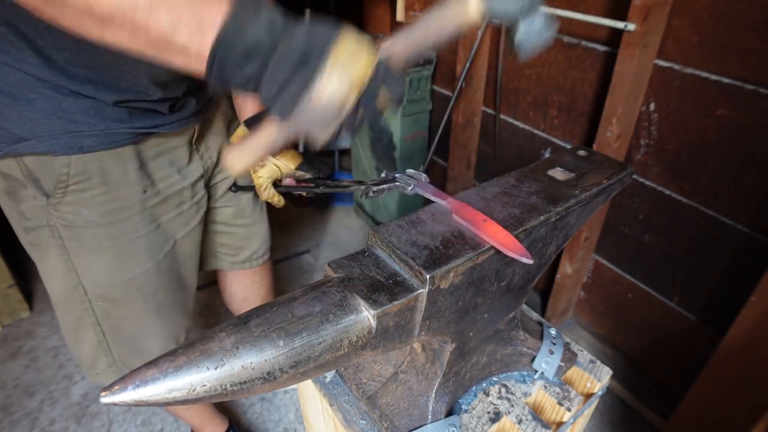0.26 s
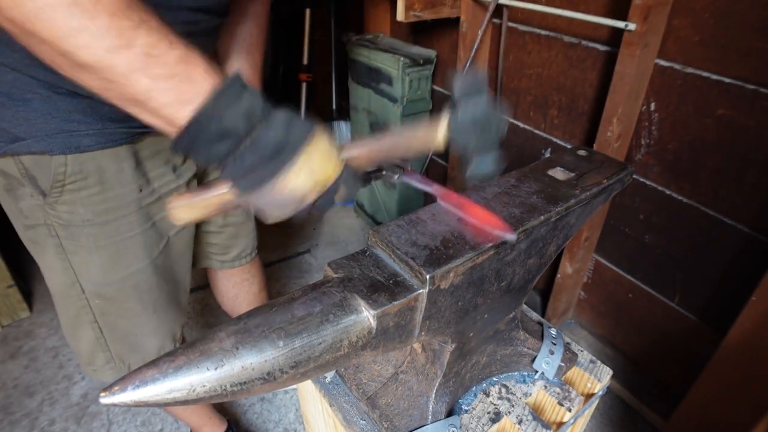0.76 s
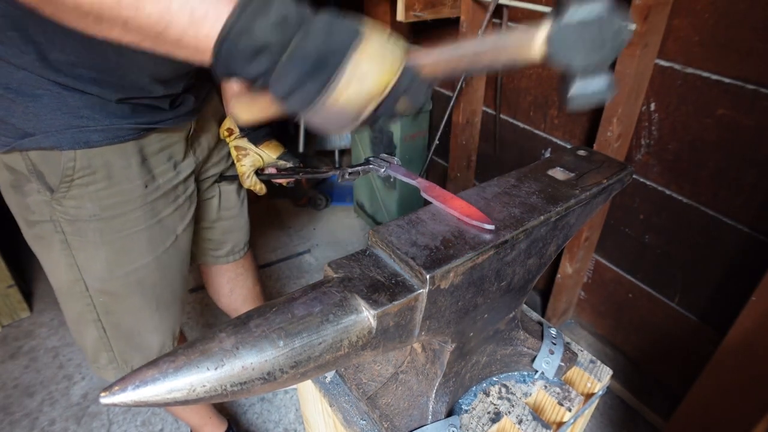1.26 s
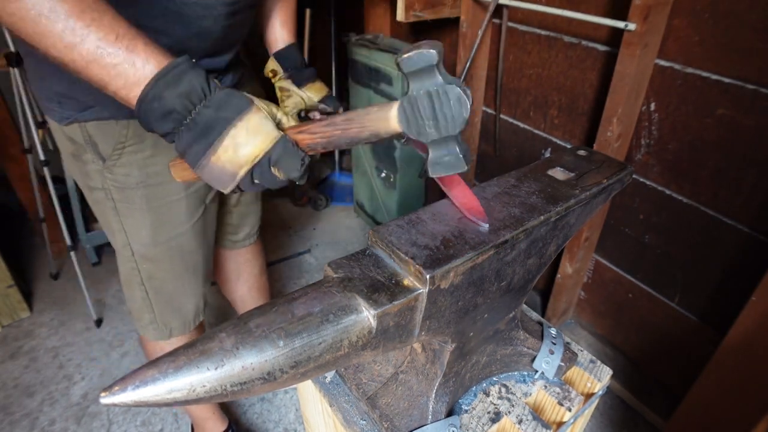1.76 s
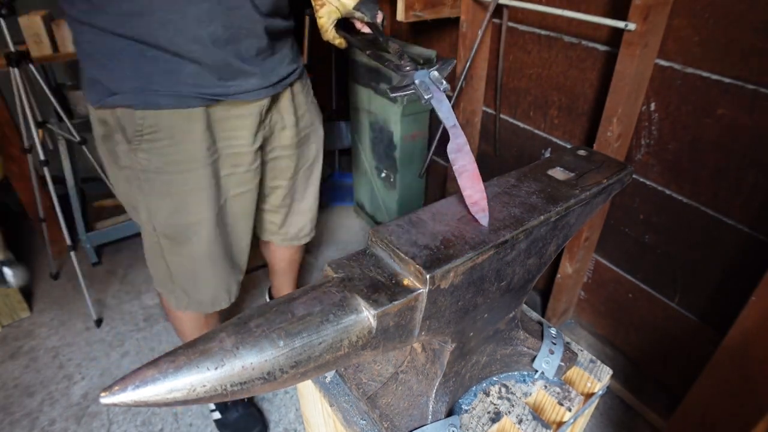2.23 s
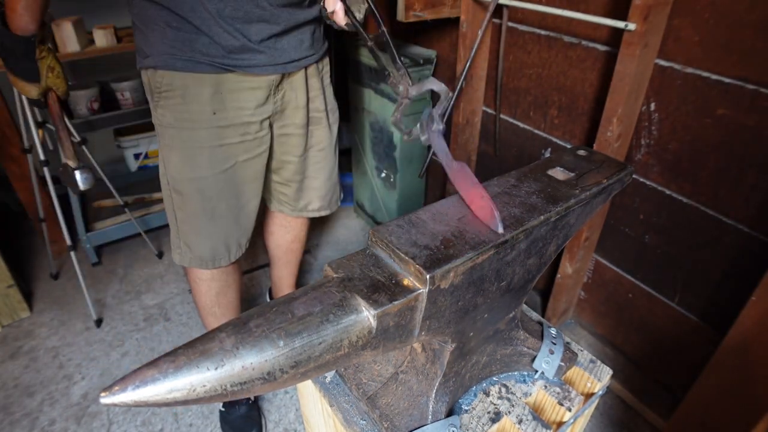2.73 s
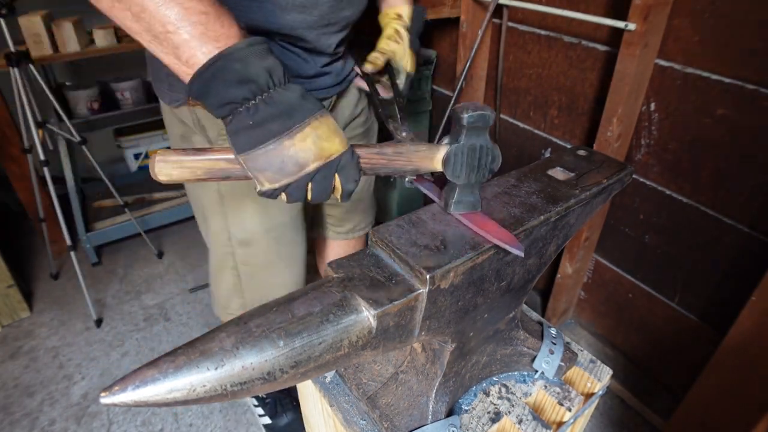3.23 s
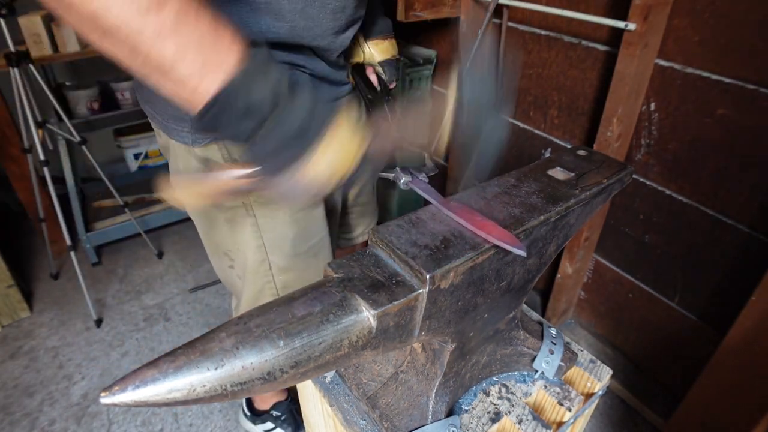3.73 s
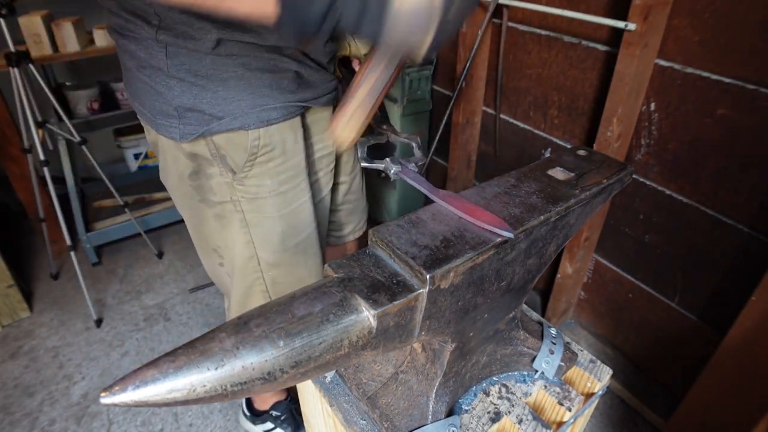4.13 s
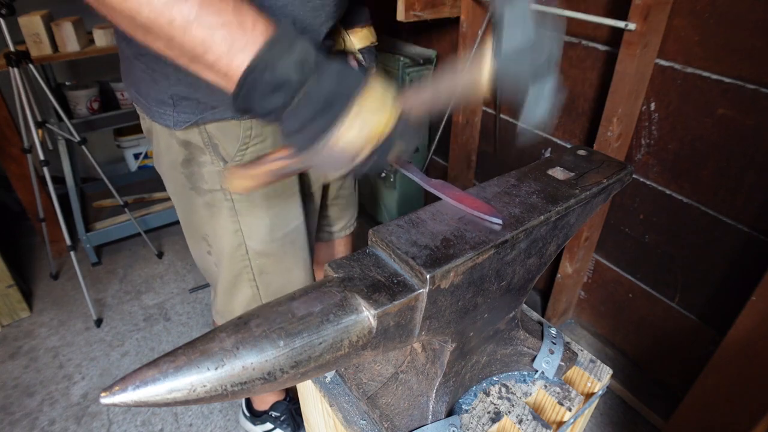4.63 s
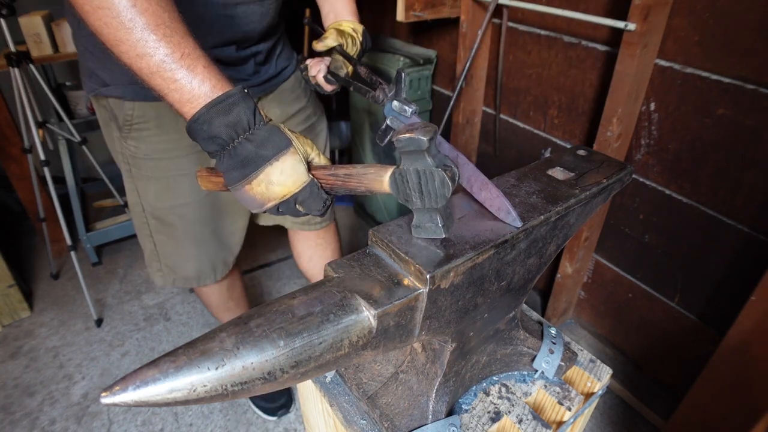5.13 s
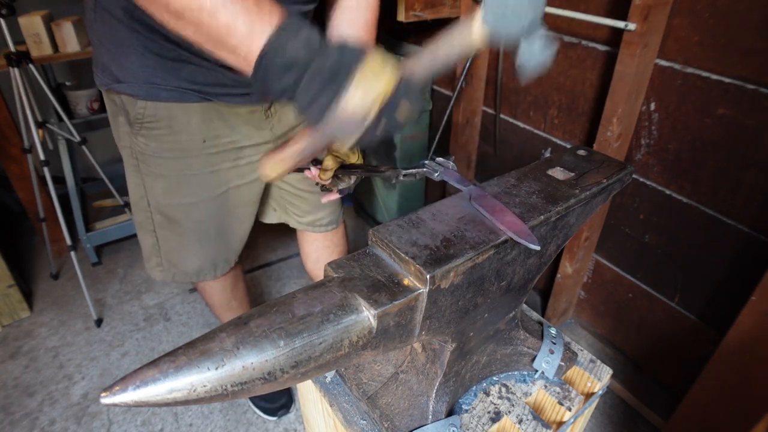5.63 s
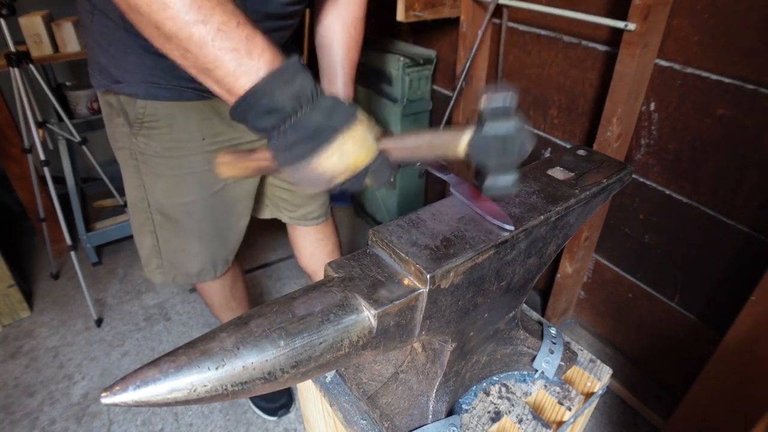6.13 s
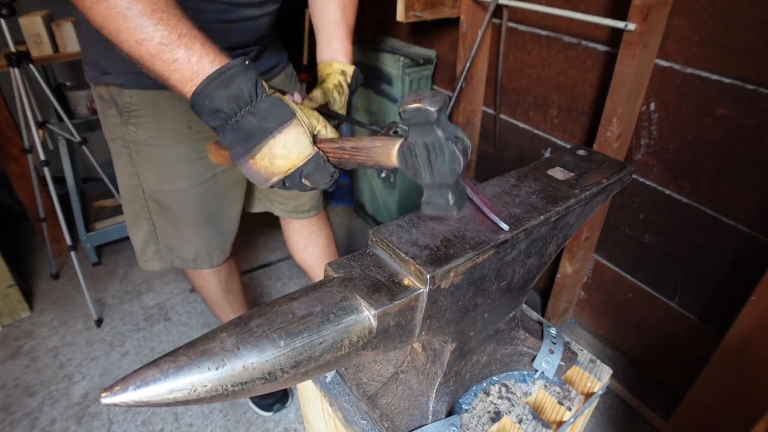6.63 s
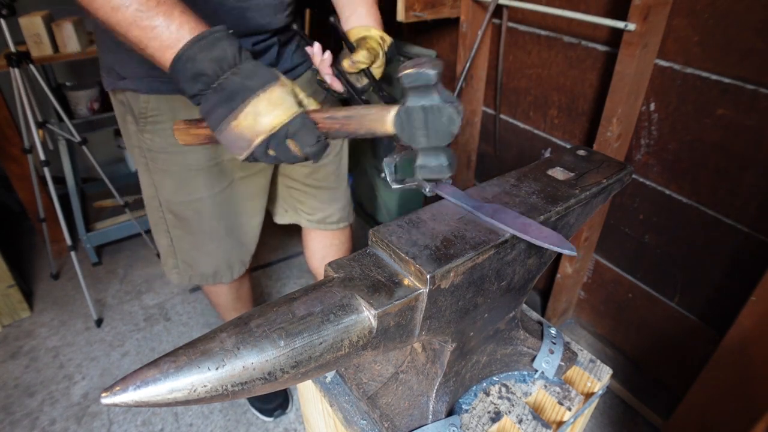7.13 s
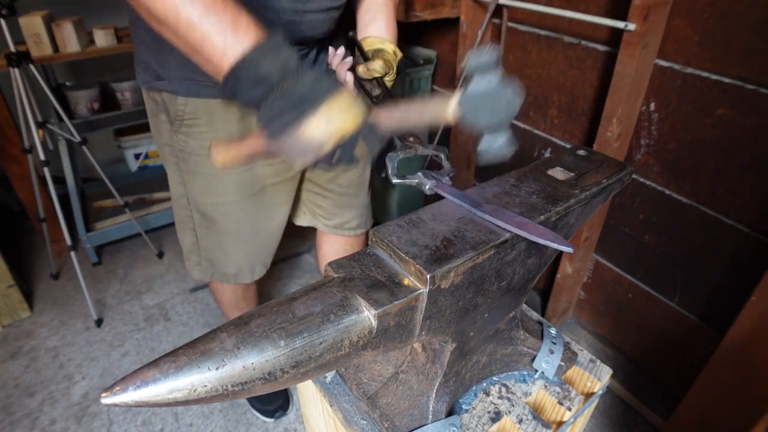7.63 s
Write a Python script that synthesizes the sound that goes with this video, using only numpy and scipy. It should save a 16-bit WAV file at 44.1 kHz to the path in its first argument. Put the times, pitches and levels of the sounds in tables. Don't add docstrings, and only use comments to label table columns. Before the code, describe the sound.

A fluttering low-mid burner roar and faint gas hiss never stop. Over them, nine sharp hammer blows on a blade, a tumbling bounce on bare anvil, a pause with chattering tongs, nine more blows, another bounce, a faster run of eight, bounces again, then four last blows. Heard near the anvil in a small wooden shop, the background ducking at each hit and recovering instantly.

```python
import sys
import numpy as np
from scipy import signal
from scipy.fft import rfft, irfft, next_fast_len
from scipy.io import wavfile
from scipy.ndimage import uniform_filter1d

SR = 44100
rng = np.random.default_rng(int(sys.argv[2]) if len(sys.argv) > 2 else 0)


def wav_out(sig):
    wavfile.write(sys.argv[1], SR, np.round(np.clip(np.atleast_2d(sig).T, -1, 1) * 32767).astype(np.int16))


def magnitude_from_level(level_db):
    exponent = np.asarray(level_db, float) / 20
    return 10 ** exponent


N = 347067

# (pitch [Hz], width [Hz], level [dB])
PIPE_MODES = [(446, 67, 12), (497, 74, 6), (587.5, 50, 9.5), (668, 87, 8), (703, 81, 7), (760, 63, 13),
              (877.2, 49, 17.5), (995, 50, 12.5), (1122, 87, 16), (1360, 43, 10), (1430, 100, 6),
              (1493, 57, 10), (1607, 81, 12), (1728, 50, 9), (1943, 86, 8), (2133, 183, -6)]
# (frequency [Hz], density [dB per Hz])
FLAME_SPECTRUM = [(18, -73), (30, -39), (91, -102), (161, -11), (289, -30.5), (454, 13), (620, -3.5),
                  (684, 14), (831, -5.5), (881, -3), (1250, -1.5), (1410, 6), (3200, -41), (4160, -68),
                  (7040, -120)]
# (frequency [Hz], density [dB per Hz])
JET_SPECTRUM = [(1410, -40), (2200, 4), (2620, 2), (3210, -13), (3720, 2), (4390, -14), (5010, 3),
                (5460, -4.5), (6290, -1), (7070, -9), (7710, -7), (9500, -12.5), (13500, -3.5),
                (15600, -12.5)]
# (centre [Hz], width [Hz], waver [dB])
JET_WHISTLES = [(2500, 500, 5), (3720, 600, 6), (5010, 900, 6), (6290, 900, 6), (7700, 1200, 5)]
# (time [s], peak [dB])
GAS_PUFFS = [(0.043, -30), (0.075, -33), (0.184, -28), (0.254, -28), (0.292, -28), (0.328, -27),
             (0.413, -33), (0.446, -30.5), (0.49, -30), (0.522, -31.5), (0.56, -40), (0.637, -30.5),
             (0.678, -30), (0.733, -32), (0.757, -33.5), (0.783, -34), (0.948, -32), (0.984, -32.5),
             (1.034, -34), (1.099, -32), (1.251, -37), (1.539, -32.5), (1.615, -34.5), (1.644, -30.5),
             (1.694, -31), (1.851, -33), (1.883, -34), (1.931, -31), (2.031, -34), (2.131, -34),
             (2.21, -31.5), (2.415, -32), (2.49, -30), (2.555, -32), (2.585, -27), (2.612, -31),
             (2.655, -32), (2.702, -29.5), (2.811, -28), (2.869, -29), (2.903, -24.5), (2.953, -29),
             (2.992, -27.5), (3.029, -28), (3.077, -29.5), (3.123, -25.5), (3.16, -23.5), (3.2, -24.5),
             (3.252, -23.5), (3.291, -29), (3.376, -25.5), (3.414, -26.5), (3.451, -25.5), (3.498, -25.5),
             (3.542, -26),
             (3.589, -35), (3.626, -28.5), (3.653, -27.5), (3.723, -31.5), (3.781, -25.5), (3.824, -32),
               (3.863, -38), (3.889, -33), (3.928, -32), (3.992, -34), (4.186, -33), (4.251, -32),
               (4.29, -34), (4.32, -36), (4.654, -32.5), (4.764, -34.5), (4.82, -31), (4.902, -33.5),
               (5.045, -32), (5.177, -34.5), (5.213, -32.5), (5.273, -31.5), (5.431, -29.5), (5.471, -31.5),
               (5.504, -29.5), (5.554, -28), (5.597, -28.5), (5.631, -28), (5.665, -28), (5.706, -26),
               (5.741, -27.5), (5.769, -33), (5.828, -29.5), (5.904, -31.5), (5.944, -33), (5.99, -30.5),
               (6.02, -31.5), (6.091, -33.5), (6.169, -32), (6.277, -32.5), (6.399, -36), (6.434, -32),
               (6.485, -36), (6.844, -34), (6.92, -33.5), (7.035, -32.5), (7.1, -31), (7.141, -32.5),
               (7.203, -34), (7.229, -29), (7.26, -29.5), (7.301, -29.5), (7.409, -29.5), (7.436, -29),
               (7.497, -35), (7.673, -32.5), (7.705, -33), (7.744, -33.5), (7.809, -33), (7.853, -34.5)]
# (time [s], gain [dB])
LEVELLER = [(0.0, 1.2), (0.35, 2.5), (0.8, -3), (1.75, -4.5), (2.1, -3), (2.3, -2.5), (2.7, 4.5),
            (3.3, 8.5), (3.62, 5), (4.15, -4.5), (4.65, -2.5), (5.08, -5), (5.62, 2.5), (6.05, -2),
            (6.8, -2.5), (7.15, -2.5), (7.47, 3), (7.87, -8.5)]
# (pitch [Hz], level [dB rms])
WHINE_TONES = [(10987, -86), (11300, -82), (11940, -85), (12242, -83), (12398, -80), (12554, -83),
               (12871, -86), (13028, -87), (13184, -75), (13340, -82), (13496, -82), (13652, -80),
               (14594, -83), (14912, -89)]

# (time [s], peak [dB])
LOW_CLICKS = [(0.116, -54), (0.533, -53), (0.686, -51), (1.006, -59), (3.26, -42), (3.563, -50), (4.875, -55),
              (4.995, -60), (5.56, -60), (5.751, -63), (6.111, -53), (6.463, -56), (7.331, -50), (7.473, -54),
              (7.713, -55)]

# (time [s], peak [dB], limiter dive [dB], brightness [dB per octave], hammer ring [dB])
TOUCHES = [
    (0.1182, -45, 16.5, -1, -22),
    (1.8083, -41, 17, 8, 7),
    (3.259, -47, 28, 2.5, -34),
    (4.877, -39, 17, 6, 10),
    (5.609, -42.5, 4.5, 8, -10),
    (7.331, -42.5, 8.5, 6, -35),
]
# (time [s], peak [dB], limiter dive [dB], hammer ring [dB], clear note [dB])
BLOWS = [(0.3876, -39.5, 22, -1, 10), (0.534, -36.5, 22, 8, 12), (0.6878, -36.5, 22.5, 7, 12),
         (0.8492, -38, 22.5, 0, 10), (1.0077, -35, 20.5, -8, 8), (1.173, -36.5, 21, 0, 7),
         (1.3276, -36, 17.5, 3, 11), (1.4914, -37.5, 20, 11, 7), (1.6533, -39.5, 22, 13, 4),
         (3.5644, -35.5, 24.5, -11, 5), (3.7003, -36, 23, -8, 5), (3.837, -37, 21, 4, 11),
         (3.9737, -37, 17.5, 0, 14), (4.1154, -37.5, 18, 8, 13), (4.2669, -38, 20, 7, 13),
         (4.421, -39.5, 21, 2.5, 16), (4.5798, -35, 17, 5, 9), (4.7409, -34, 18, 6, 8),
         (5.7529, -37, 22, -3, 6), (5.8777, -37.5, 21.5, 2, 12), (5.9973, -41, 20, -10, 5),
         (6.1144, -39, 16.5, 0, 4), (6.2264, -37.5, 16.5, -6, 5), (6.3459, -35, 15.5, -3, -2),
         (6.4633, -35, 16, -3.5, 1), (6.5735, -34.5, 13, -2, -3), (7.4739, -37, 20.5, 4, 4),
         (7.5916, -39, 21, 8, 13), (7.7138, -38, 18.5, 6, 18), (7.8349, -38, 17, -3, 13)]
# (time [s], peak [dB], limiter dive [dB], click [dB], brightness [dB per octave])
BOUNCES = [(1.9134, -42, 16.5, -24, 5), (1.9718, -40.5, 11.5, -20.5, 2), (2.0065, -35, -1.5, -24, 1),
           (2.0295, -38.5, -2.5, -26, -3.5), (2.0462, -42, -4, -30, -7), (2.0578, -57, 1, -29, -3),
           (2.0925, -36, -5, -22, -2), (2.1274, -41, -7, -30, -5), (4.97, -40, 12, -22.5, 3),
           (5.0176, -39.5, 7.5, -21.5, 4), (5.0468, -35.5, -10, -21, 2), (6.7003, -42, 16.5, -19.5, 3),
           (6.7644, -41, 11, -23, 2), (6.807, -42, 10.5, -23, 1), (6.8363, -34, -7, -23, 4),
           (6.8514, -37, -7, -30, -4), (2.071, -54, -14, -32, -3), (5.0585, -51, -16, -30, -3),
           (6.8605, -49, -11, -32, 1)]
# (time [s], peak [dB], bright ring [dB])
TONG_TICKS = [
    (2.2174, -64, -14),
    (5.4088, -55, 0),
    (5.472, -62, -10),
    (5.515, -64, -10),
]

# (level [dB], t60 [s], extra on the bare face [dB])
ANVIL_HZ = [2285, 2370, 2975, 3650, 3738, 3800, 3855, 3925, 4735, 4967, 5330, 7530, 7655, 7800, 7930, 8045,
            8730]
ANVIL_MODES = [(-21, 0.14, -8), (-33, 0.078, 14), (-26, 0.098, 5), (-22.5, 0.099, 2), (-17.5, 0.11, -3),
               (-19, 0.095, -2), (-20, 0.14, -3), (-27, 0.11, 8), (-20.5, 0.1, 1.5), (-14, 0.086, -14),
               (-28, 0.11, 6), (-21, 0.075, 10), (-29, 0.059, 10), (-31, 0.07, 18), (-31, 0.054, 12),
               (-27.5, 0.081, 17), (-26, 0.08, -8)]
# (level [dB], t60 [s], extra on the bare face [dB])
HAMMER_HZ = [11030, 11062, 12500, 15194, 15225]
HAMMER_MODES = [(-36, .08, 11), (-36, .08, 11), (-30, .07, -3), (-33, .07, 1), (-35, .07, 2)]
# (level [dB], t60 [s], extra on the bare face [dB])
STAND_HZ = [165, 205, 240]
STAND_MODES = [(-44, 0.12, -2), (-36.5, 0.14, -4), (-44, 0.33, 1.5)]
# (centre [Hz], width [Hz], level [dB], extra on the bare face [dB])
CROWDED_MODES = [(2430, 720, -12, -2), (3720, 380, -6.5, -4), (4885, 780, -7.5, -5),
                 (7420, 2940, -7.5, -3.5), (7800, 960, -24, 11), (11000, 130, -10, -6.5),
                 (12300, 130, -16, -14), (15200, 150, -15, -10), (14700, 1900, -12, -10)]
# (frequency [Hz], density [dB per Hz])
WASH_SPECTRUM = [(300, -3), (600, 1), (1200, 2.5), (2300, 8), (3100, 0.9), (4300, 2), (5600, 4),
                 (6800, 1.5), (8800, 5.5), (10200, 1), (11800, 1.5), (13200, -6), (14600, 3), (16500, 4.5)]
# (frequency [Hz], t60 [s])
WASH_T60 = [(500, 0.34), (3000, 0.27), (16000, 0.19)]

# (time [s], peak [dB])
RATTLES = [
    (0.1185, -40),
    (3.2587, -30),
    (5.4088, -65),
    (5.6085, -48),
    (7.331, -50),
]
# (time [s], peak [dB])
CLINKS = [
    (2.975, -53),
    (3.168, -51),
    (3.18, -46),
    (3.415, -56),
    (7.2723, -53),
]
# (level [dB], t60 [s], extra on the bare face [dB])
REIN_HZ = [3880, 6100, 6620]
REIN_MODES = [(-2, 0.056, 0), (-5, 0.054, 0), (-6, 0.046, 0)]

# (frequency [Hz], side minus mid [dB])
SIDE_DB = [(60, -45), (200, -33), (380, -29), (600, -42.5), (900, -19), (1290, -19), (2380, -12),
           (4400, -8), (8120, -8.5), (15000, -8)]


def curve(table, hz):
    f, v = np.transpose(table)
    return np.interp(np.log(hz), np.log(f), v)


def filtered(x, table):
    size = next_fast_len(N)
    gain = magnitude_from_level(curve(table, np.arange(1, size // 2 + 2) * SR / size))
    return irfft(rfft(x, size) * gain, size)[..., :N]


def coloured(table, count):
    x = filtered(rng.standard_normal((count, next_fast_len(N))), table)
    return x / x.std()


def stereo(mid, side):
    side = filtered(side, SIDE_DB)
    return np.array([mid + side, mid - side])


def walk(rate):
    hold = int(SR / rate)
    steps = np.repeat(rng.standard_normal(N // hold + 1), hold)
    return 0.39 * uniform_filter1d(uniform_filter1d(steps, hold), hold)[:N]


def spikes(times, sizes):
    x = np.zeros(N, np.result_type(sizes, float))
    np.add.at(x, np.clip((times * SR).astype(int), 0, N - 1), sizes)
    return x


def fade(x, t60, hz=0):
    turn = np.exp(2j * np.pi * hz / SR) if hz else 1
    return signal.lfilter([1], [1, -turn * np.exp(-np.log(1000) / (t60 * SR))], x)


def band(x, hz, width):
    return signal.lfilter(*signal.iirpeak(hz, hz / width, SR), x)


def puffs(roar_db):
    times, puff_db = np.transpose(GAS_PUFFS)
    steady = magnitude_from_level(roar_db[(times * SR).astype(int)] + 4.5)
    return spikes(times, np.clip(magnitude_from_level(puff_db - 5.5) - steady, 0, None))


def forge():
    t = np.arange(N) / SR
    gain_db = np.interp(t, *np.transpose(LEVELLER))
    roar_db = -44 + 0.69 * gain_db
    hiss_db = -68 + gain_db

    lit = puffs(roar_db)
    flame = magnitude_from_level(roar_db + 1.8 * walk(32))
    flame = flame + 1.83 * (fade(lit, 0.065) - fade(lit, 0.013))
    pipe = np.zeros((2, N))
    for hz, width, db in PIPE_MODES:
        pipe += magnitude_from_level(db + 6.5 * walk(15)) * band(rng.standard_normal((2, N)), hz, 0.43 * width)
    roar = pipe / pipe.std() + magnitude_from_level(0.5) * coloured(FLAME_SPECTRUM, count=2)

    puffing = (flame / magnitude_from_level(roar_db)) ** 0.39
    jet = coloured(JET_SPECTRUM, count=2) * magnitude_from_level(hiss_db + 4.0 + 1.0 * walk(6.8)) * puffing
    guttering = np.zeros((2, N))
    for hz, width, waver_db in JET_WHISTLES:
        guttering += band(jet, hz, width) * (magnitude_from_level(waver_db * walk(22.18)) - 1)
    jet = jet + guttering

    whine = np.zeros(N)
    for hz, db in WHINE_TONES:
        whine += magnitude_from_level(db - 3) * np.sin(2 * np.pi * (hz * t + rng.random()))
    whine_at_hiss_db = -63
    return stereo(*(roar / roar.std() * flame + jet)) + whine * magnitude_from_level(hiss_db - whine_at_hiss_db)


def low_clicks():
    times, db = np.transpose(LOW_CLICKS)
    return fade(spikes(times, magnitude_from_level(db)), 0.011, 130).imag


def strikes():
    rows = []
    for s, db, dive, head, note in BLOWS:
        harder_db = db + 37
        rows.append((s, db, dive, 0.44 + 0.15 * harder_db, -3.5 - 0.5 * harder_db, head, note))
    for s, db, dive, bright, head in TOUCHES:
        rows.append((s, db, dive, bright, -3 + 0.14 * head, head, head + 3.3))
    for s, db, head in TONG_TICKS:
        rows.append((s, db, 0, 4.5, -4, head, head))
    for s, db, dive, _, bright in BOUNCES:
        head = 0.59 * dive
        rows.append((s, db, dive, bright, 7 - 0.18 * dive, 0.5 + head, 7 + head))
    return np.transpose(rows)


def swell(times, db, on_face, hz):
    t60 = curve(WASH_T60, hz)
    blade = spikes(times, magnitude_from_level(db) * ~on_face)
    face = spikes(times, magnitude_from_level(db) * on_face)
    body = fade(blade, t60 * 0.47) + fade(face, t60 * 0.41)
    build_up = fade(blade, 0.0026 + 40 / hz) + fade(face, 0.0008 + 8 / hz)
    late = magnitude_from_level(-26) * fade(blade + face, 0.14)
    return body - build_up + late


def wash(times, db, on_face, bright, anvil_db):
    out, dense, noise = np.zeros((2, N)), coloured(WASH_SPECTRUM, count=2), rng.standard_normal((2, N))
    for hz in 400 * 2 ** np.arange(0, 5.6, .5):
        sos = signal.butter(2, [hz * 2 ** -.25, hz * 2 ** .25], "band", fs=SR, output="sos")
        envelope = swell(times, db + bright * np.log2(hz / 6000), on_face, hz)
        out += envelope * signal.sosfilt(sos, dense)
    for hz, width, crowd_db, face_db in CROWDED_MODES:
        ring = band(band(noise, hz, width), hz, width) * np.sqrt(SR / width)
        out += magnitude_from_level(crowd_db - 4.5) * swell(times, db + anvil_db + face_db * on_face, on_face, hz) * ring
    grain = magnitude_from_level(4 * walk(300))
    return magnitude_from_level(-1.0) * stereo(*out * grain)


def crack(times, db, on_face):
    grit = rng.standard_normal((2, N))
    contact = spikes(times, magnitude_from_level(db + 17) * ~on_face)
    blade = band(contact + magnitude_from_level(-12.0) * fade(contact, .005) * grit[0], 7000, 11000)
    tap_s, _, dive_db, click_db, _ = np.transpose(BOUNCES)
    tap = spikes(tap_s, magnitude_from_level(click_db + 8 + dive_db / 2))
    face = band(tap + magnitude_from_level(-9.0) * fade(tap, 0.0075) * grit[1], 4700, 9000)
    return blade + magnitude_from_level(1.0) * band(face, 5700, 9000)


def rings(pitches, modes, times, db, on_face, scatter_db):
    chance = rng.standard_normal((len(times), len(modes), 2))
    mid, side = np.zeros((2, N))
    for k, (hz, (mode_db, t60, face_db)) in enumerate(zip(pitches, modes)):
        size = magnitude_from_level(db + mode_db + face_db * on_face + scatter_db * chance[:, k, 0])
        size = size * np.sign(chance[:, k, 1])
        flutter = magnitude_from_level(4 * walk(70))
        ring = fade(spikes(times, size), t60, hz) * flutter
        mid += ring.imag
        side += magnitude_from_level(curve(SIDE_DB, hz)) * ring.real
    return np.array([mid + side, mid - side])


def sing(times, db):
    hz, rise_s, t60_s, tail_s = 13783, 0.046, 0.16, 0.3
    x = spikes(times, magnitude_from_level(db - 26.5))
    ring = fade(x, t60_s, hz) - fade(x, rise_s, hz) + magnitude_from_level(-35) * fade(x, tail_s, hz)
    return ring.imag + magnitude_from_level(-11.5) * ring.real * np.array([[1], [-1]])


def hammer(times, db, on_face, bright, anvil_db, hammer_db, note_db):
    out = wash(times, db, on_face, bright, anvil_db) - crack(times, db, on_face)
    out = out + rings(ANVIL_HZ, ANVIL_MODES, times, db + anvil_db + 0.5, on_face, 2.9)
    out = out + rings(HAMMER_HZ, HAMMER_MODES, times, db + hammer_db + 10.5, on_face, 3.0)
    out = out + rings(STAND_HZ, STAND_MODES, times + 0.007, db, on_face, 1.8)
    return out + sing(times, db + note_db)


def rattle():
    times, db = np.transpose(RATTLES)
    hz, width_hz, t60_s = 14100, 5000, 0.09
    jaws = band(band(rng.standard_normal((2, N)), hz, width_hz), hz, width_hz)
    envelope = fade(spikes(times, magnitude_from_level(db + 7.5)), t60_s) * magnitude_from_level(2.1 * walk(150))
    return stereo(*(jaws / jaws.std() * envelope))


def clinks():
    times, db = np.transpose(CLINKS)
    return rings(REIN_HZ, REIN_MODES, times, db, 0, 2.2)


def scene():
    times, peak_db, dive_db, *colour = strikes()
    on_face = np.arange(len(times)) >= len(BLOWS + TOUCHES)
    return forge() + hammer(times, peak_db + dive_db, on_face, *colour) + rattle() + clinks()


def limiter_gain():
    look_ahead_s, release_s = 0.001, 0.038
    times, dive_db = np.transpose([row[:3:2] for row in BLOWS + TOUCHES + BOUNCES])
    power = fade(spikes(times - look_ahead_s / 2, magnitude_from_level(2 * dive_db)), release_s)
    return uniform_filter1d((1 + power) ** -.5, size=int(look_ahead_s * SR))


def band_limit(x):
    return signal.sosfilt(signal.butter(12, 17020, fs=SR, output="sos"), x)


def record(dry):
    bass_cut = signal.butter(2, 125, "high", fs=SR, output="sos")
    cut = signal.sosfilt(bass_cut, dry * limiter_gain())
    rumble = signal.lfilter(*signal.butter(2, 55, fs=SR), rng.standard_normal(N))
    rumble = magnitude_from_level(-90.5 + 25.5) * rumble
    ports = magnitude_from_level(0.3 * np.array([[.5], [-.5]]))
    heard = .12 * np.tanh((cut + low_clicks() + rumble) * ports / 0.11)
    top_step = signal.ellip(8, .1, 40, 15750, fs=SR, output="sos")
    low = signal.sosfiltfilt(top_step, heard)
    return band_limit(low + magnitude_from_level(-38.0) * (heard - low))


dry = scene()
out = record(dry)
wav_out(out)
```